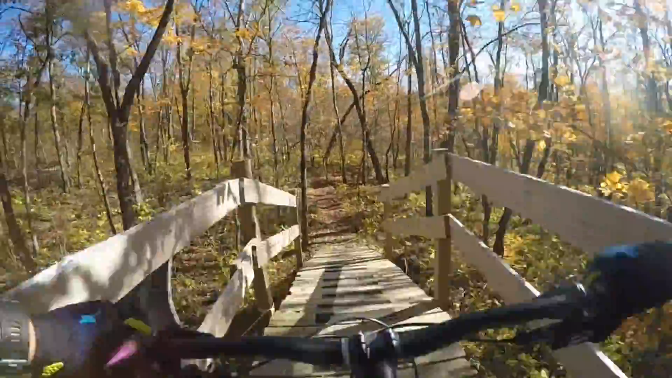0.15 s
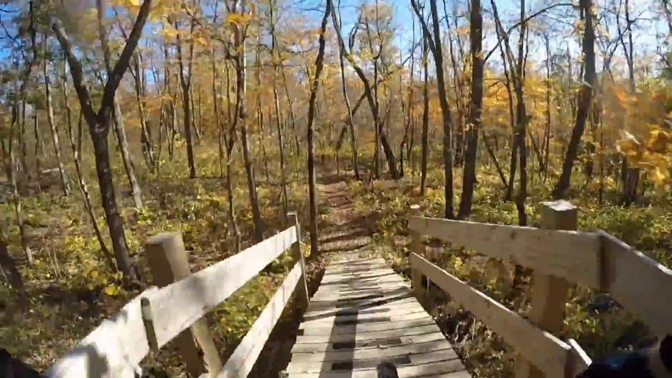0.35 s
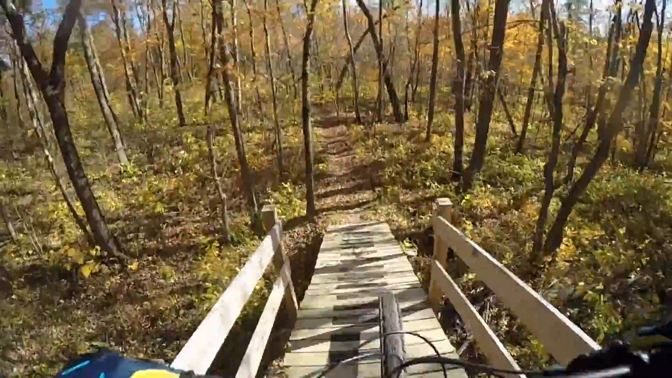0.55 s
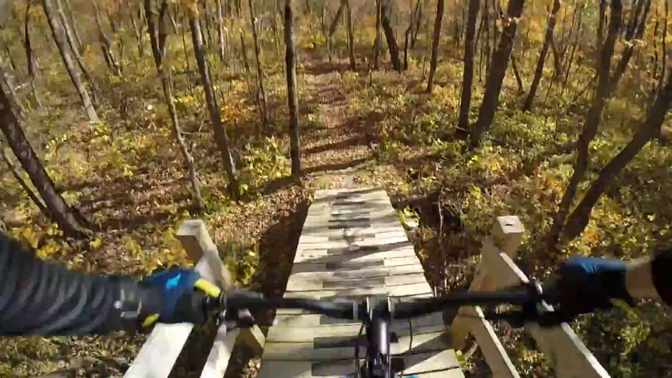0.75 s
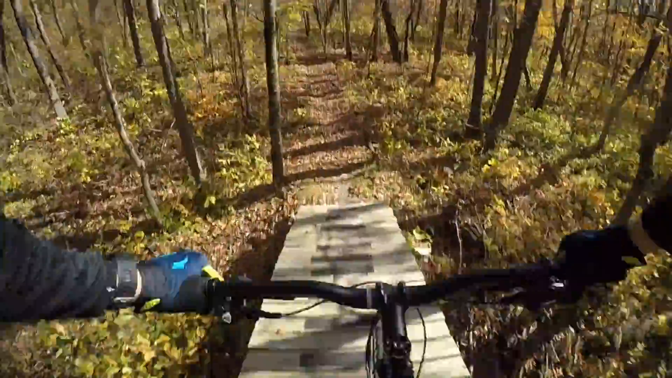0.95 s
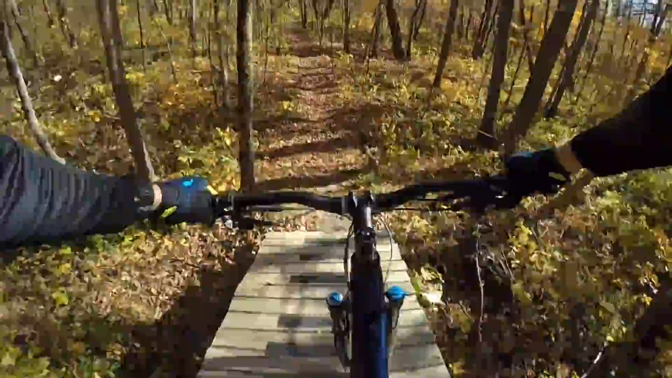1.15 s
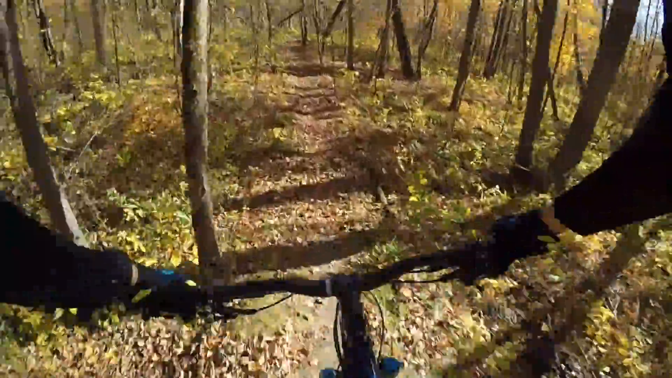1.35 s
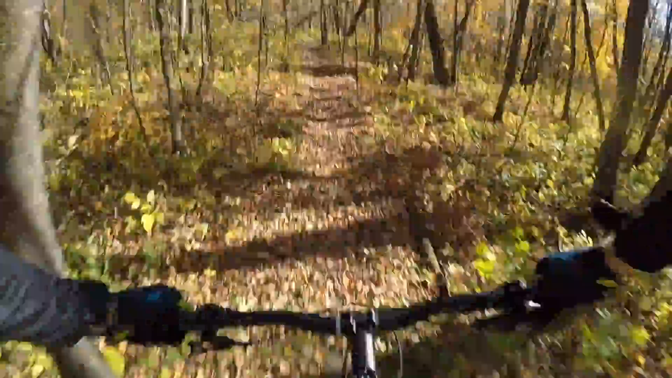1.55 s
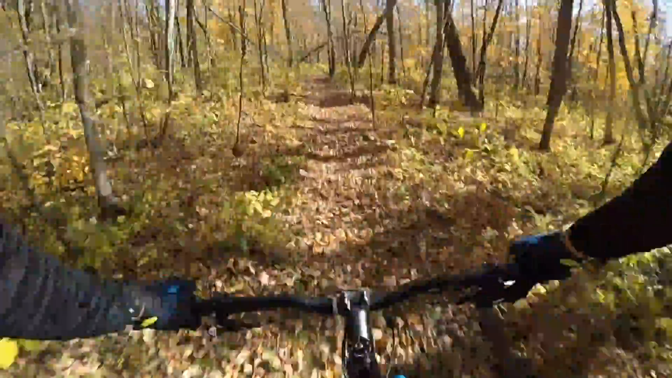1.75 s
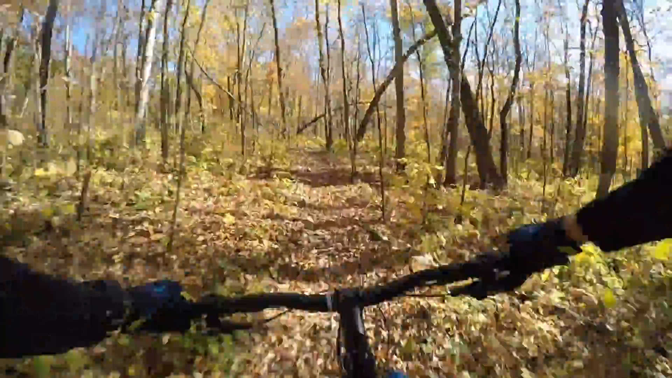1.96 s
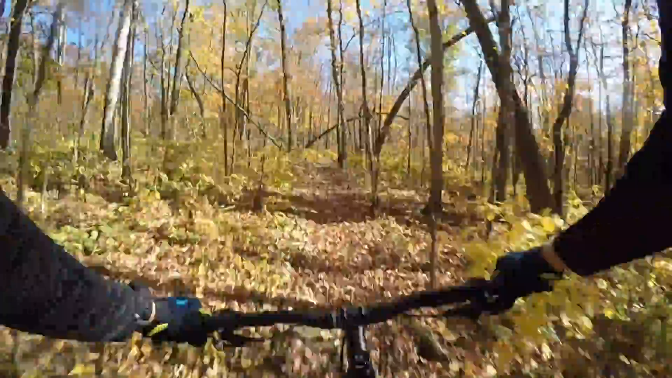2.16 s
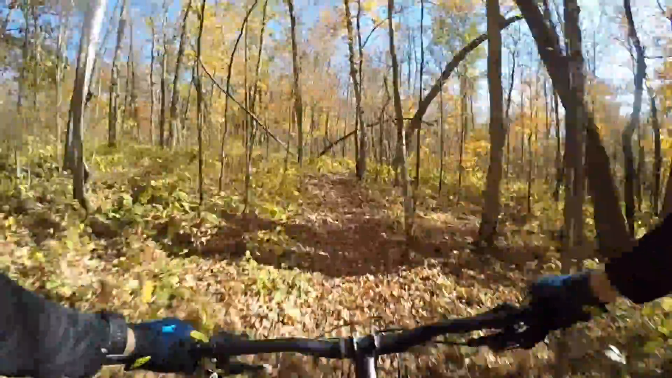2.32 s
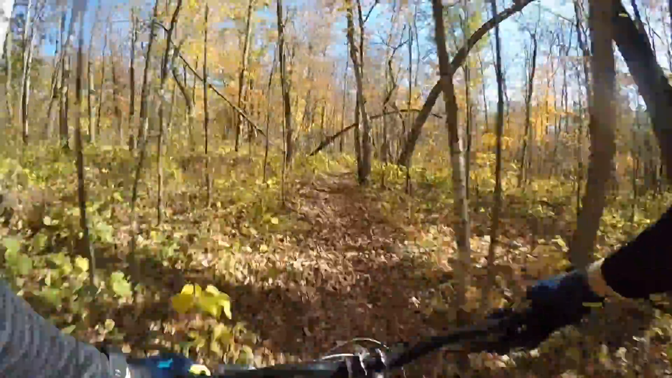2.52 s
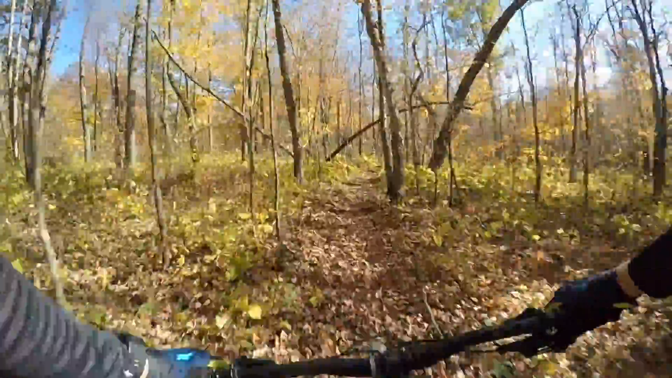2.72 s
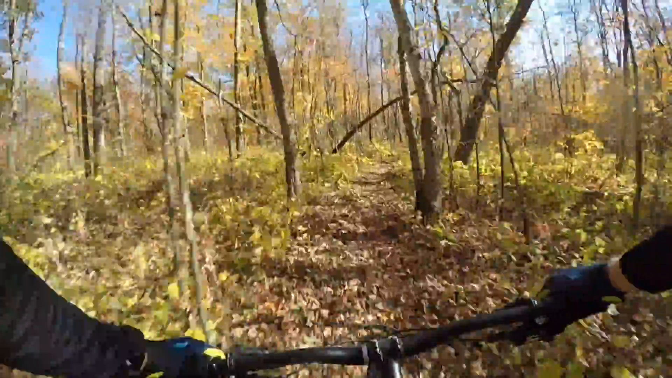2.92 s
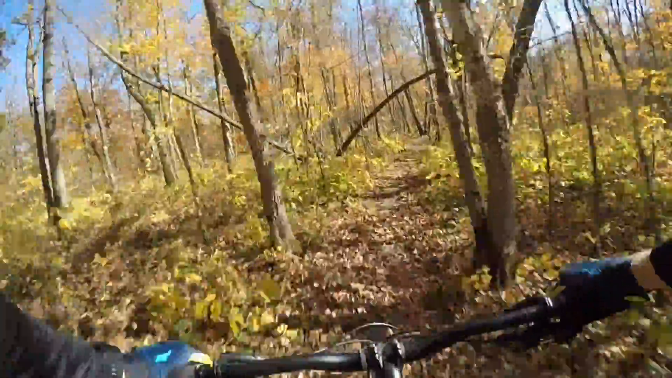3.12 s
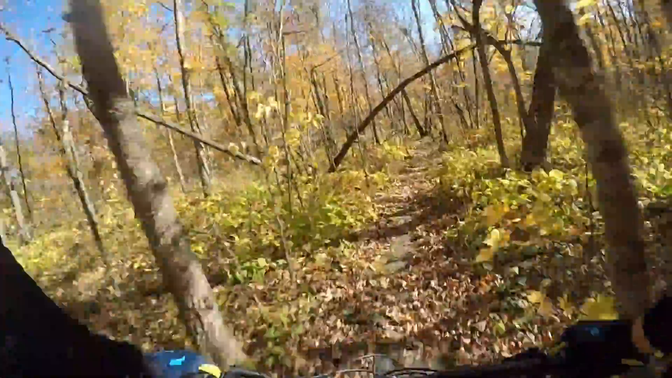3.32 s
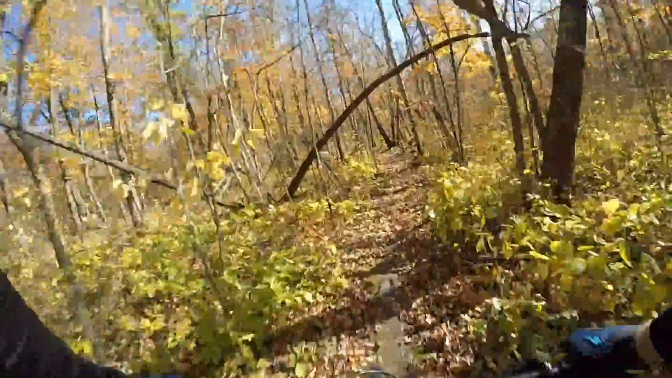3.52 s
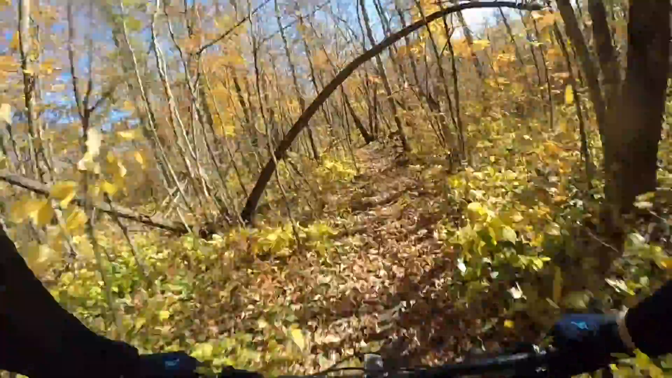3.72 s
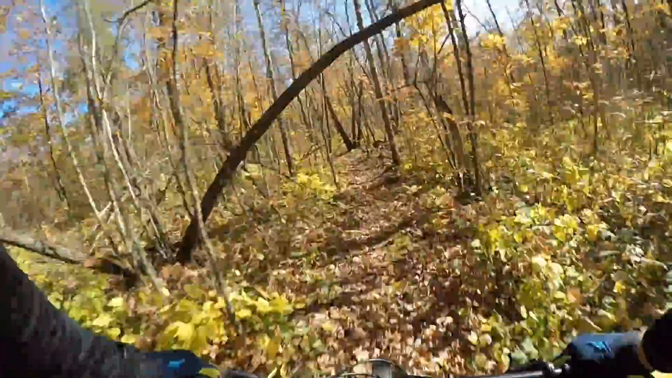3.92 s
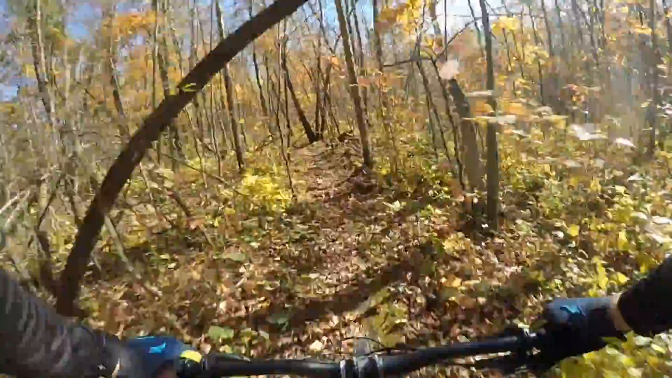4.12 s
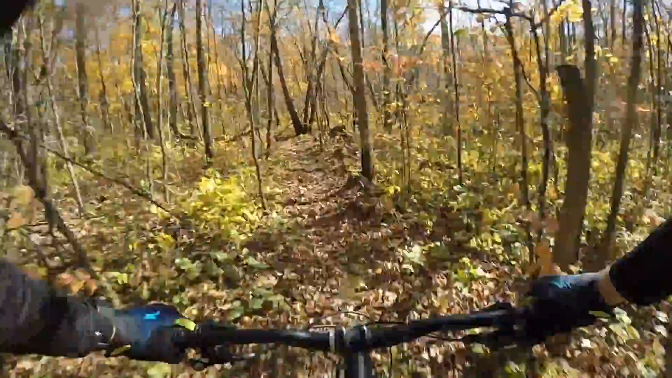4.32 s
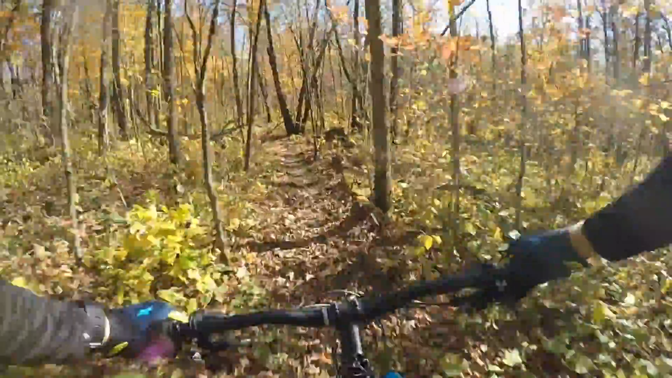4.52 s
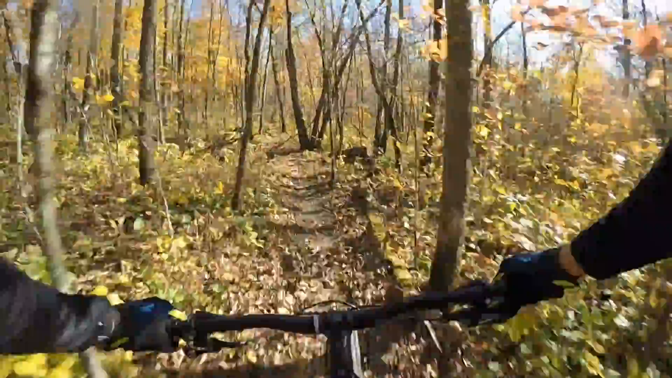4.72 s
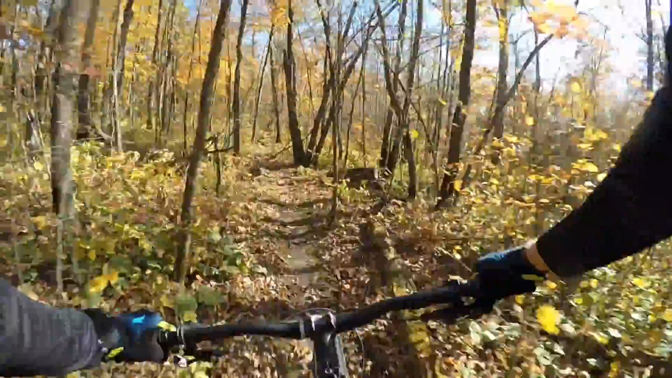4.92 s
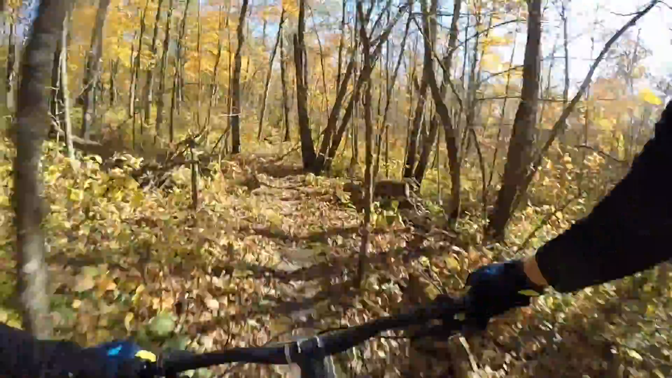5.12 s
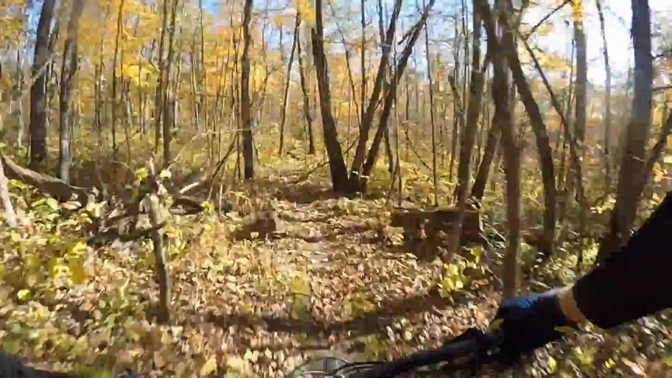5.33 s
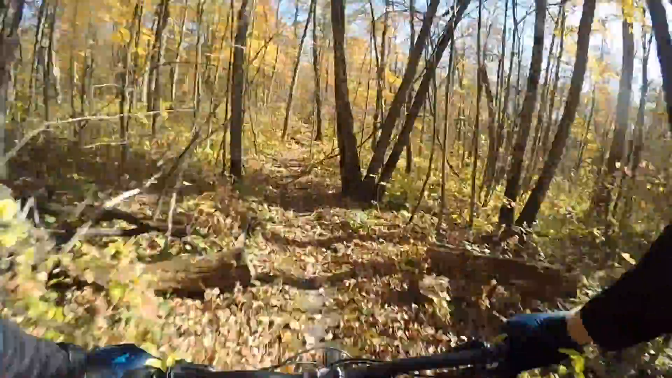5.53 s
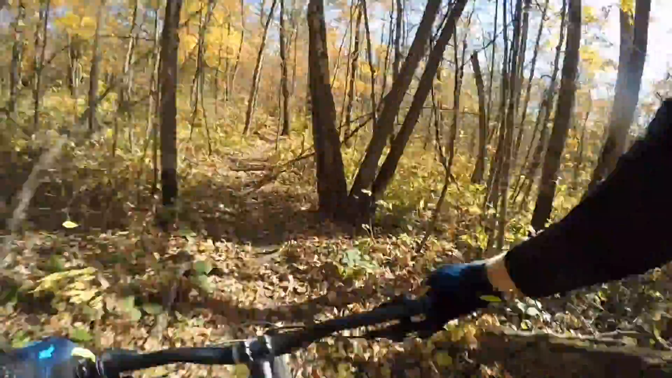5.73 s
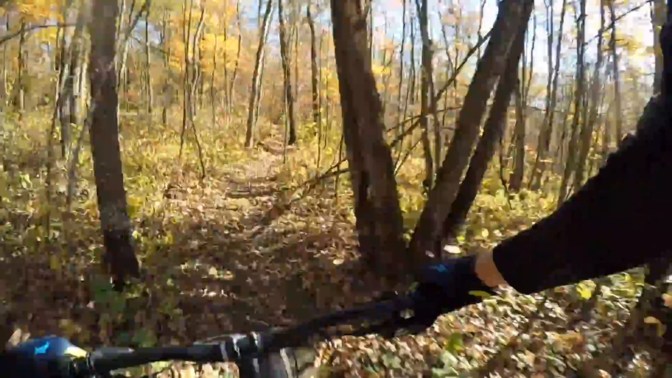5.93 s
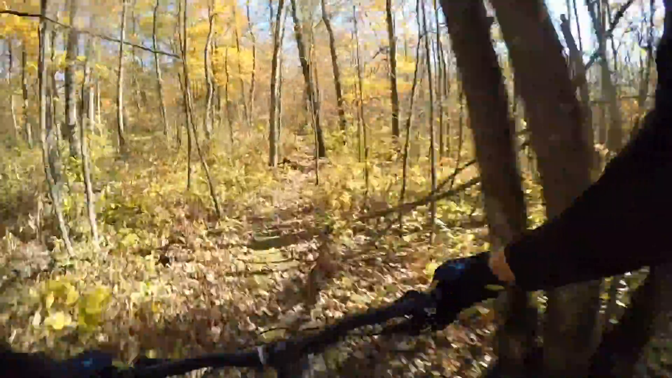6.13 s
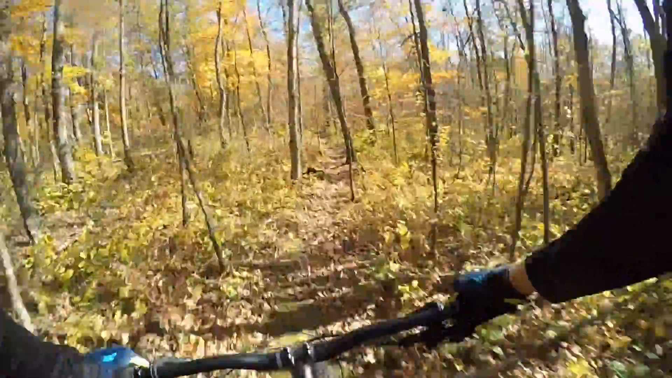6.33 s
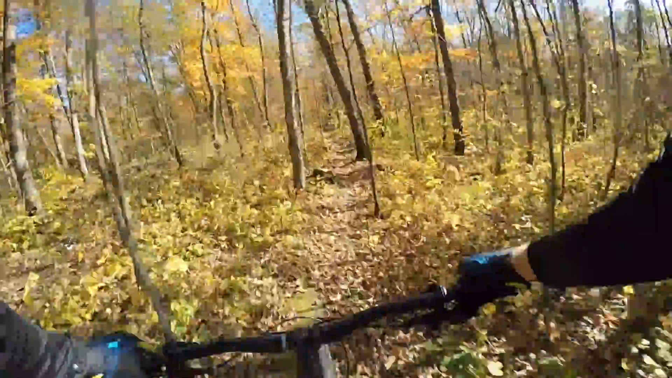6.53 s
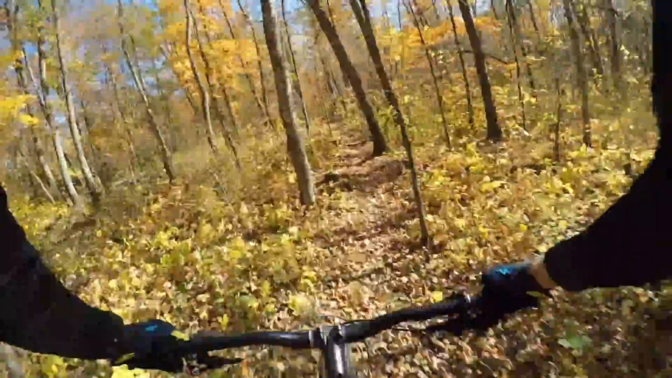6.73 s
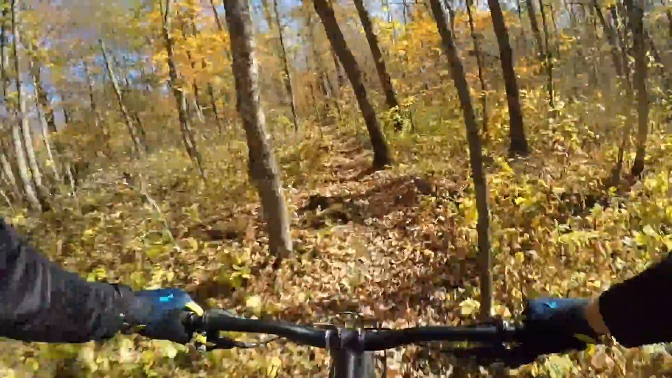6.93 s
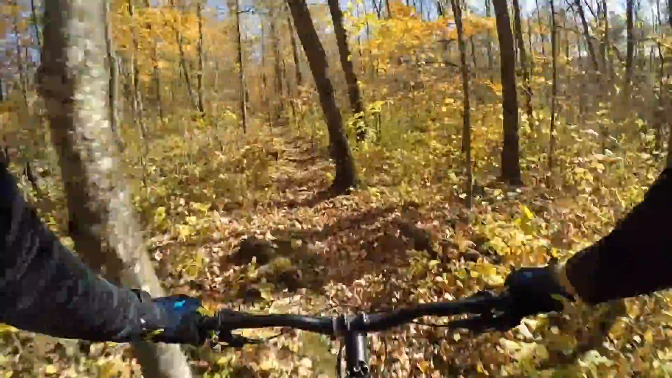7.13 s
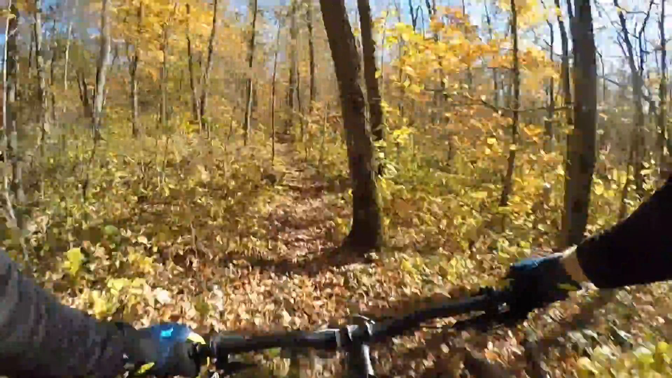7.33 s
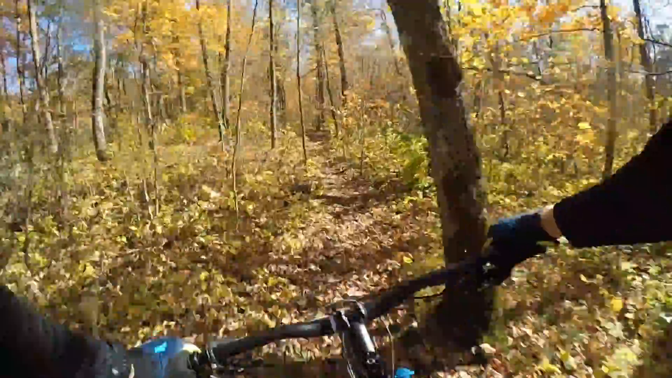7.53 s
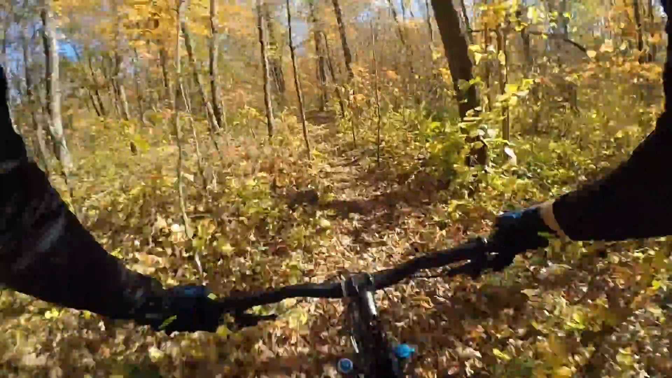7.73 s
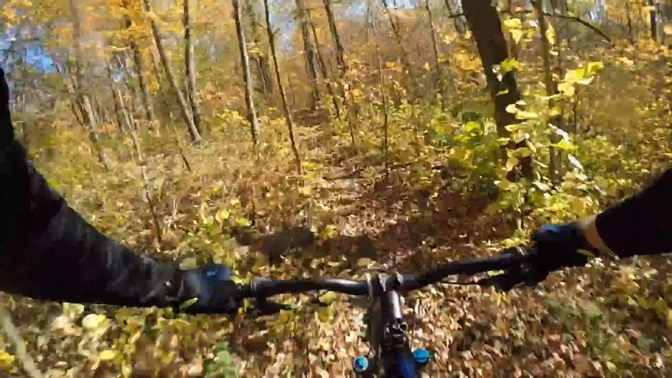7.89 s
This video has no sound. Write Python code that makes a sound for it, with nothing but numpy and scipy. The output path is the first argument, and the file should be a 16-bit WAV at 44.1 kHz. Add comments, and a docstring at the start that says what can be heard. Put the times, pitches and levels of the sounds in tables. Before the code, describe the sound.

A mountain bike clatters over wooden planks, lands with a thud and crunches on through dry leaves and snapping twigs.

```python
"""On a woodland trail, a mountain bike clatters over a plank bridge, drops off its end and rolls on
through dry fallen leaves. The tyres hiss on wood and hum on dirt, the coasting hub ticks, bumps knock
the frame, twigs snap and leaves crunch. We listen from a camera on the rider's chest: its plastic case
colours the crunch and clacks at the bumps, and its harness passes on deep jolts and a steady thump,
most likely the rider's fast heartbeat."""
import sys
import numpy as np
from scipy import signal
from scipy.fft import rfft, irfft
from scipy.io import wavfile
from scipy.ndimage import uniform_filter1d

SR = 44100
rng = np.random.default_rng(int(sys.argv[2]) if len(sys.argv) > 2 else 0)


def wav_record(signal):
    """Record a signal, one row per channel, as 16-bit PCM in the file named by sys.argv[1]."""
    frames = np.transpose(np.atleast_2d(signal))
    bounded = np.clip(frames, -1, 1)
    # unit amplitude maps onto the largest positive 16-bit level
    quanta = np.round(bounded * 32767).astype(np.int16)
    wavfile.write(sys.argv[1], SR, quanta)


N = 355446
T = np.arange(N) / SR
TAPS = 2048  # samples in one short ring or rattle

# bumps that hit the bike: time_s, knock_db, knock_pitch_hz, clack_db, thud_db
BUMPS = [(0.013, -20, 560, -22, -5), (0.286, -10, 553, 3, 4.5), (0.757, -11.5, 1660, -15, -22),
         (0.806, -9.5, 2680, -25, -38), (0.821, -13, 1260, -37, -18), (0.911, -10, 1330, -4, -7),
         (0.925, -13, 1000, -14, -9), (0.957, -12, 1390, -1.5, -12), (1.052, -20, 2880, -24, -25),
         (1.074, -5.5, 3040, -7.5, 2.5), (1.203, -18, 1140, -26, -21), (1.598, -21, 1500, -7, -6.5),
         (1.699, -4.5, 1130, -21, -5), (2.019, -16, 1370, -9.5, -32), (2.154, -17.5, 1270, -26, -19),
         (3.012, -15, 1250, -4, -26), (4.494, -24, 1200, -37, -20), (4.626, -13.5, 1250, -22, -21),
         (5.253, -22.5, 1475, -28, -30), (6.848, -28, 1550, -11, -15), (7.262, -19, 1200, -27, -31)]
# pitches at which the camera case rings: pitch_hz, width_hz, boost_db
CASE_RINGS = [(1728, 266, 7), (2357, 620, 13.5), (3392, 457, 10.5), (3978, 603, 11), (4444, 195, 10),
              (5250, 210, 7), (5662, 240, 9), (6370, 230, 3), (6820, 104, 5), (7430, 780, 2),
              (9380, 730, 1.5), (10900, 560, 4.5), (13160, 760, 5.5)]
# tone of a breaking twig, also used for grit and a tyre scuff: pitch_hz, level_db
TWIG_TONE = [(300, -20), (1200, 2), (2300, 7.5), (4500, 4), (7000, 3), (10000, -7), (15500, -14)]
# how rough the ground is: time_s, tyre_rumble_db, harness_sway_db
GROUND = [(0, -38.5, -28), (.15, -56, -21), (.8, -51, -22), (1.15, -51, -21.5), (1.4, -47.5, -26),
          (1.7, -45.5, -18.5), (2.6, -54, -27), (5.3, -55, -26), (6.1, -53, -25.5), (8.06, -64, -29.5)]


def undb(db):
    """Turn decibels into a number to multiply by."""
    return 10 ** (np.asarray(db) / 20)


def unit(x):
    """Scale a sound to an average power of 1."""
    return x / np.sqrt(np.mean(x ** 2))


def unit_energy(x):
    """Scale a short sound to a total energy of 1."""
    return x / np.sqrt(np.sum(x ** 2))


def curves(table):
    """Join the values in each column of a table with straight lines over time."""
    times_s, *columns = np.transpose(table)
    return [np.interp(T, times_s, column) for column in columns]


def add(track, start_s, sound):
    """Mix a sound into a track at a given time."""
    i = int(np.clip(start_s * SR, 0, N - 1))
    track[i:i + len(sound)] += sound[:N - i]


def wobble(per_s):
    """A smooth random wobble, about 1 in size, with per_s new values each second."""
    hold = max(int(SR / per_s), 1)
    steps = rng.standard_normal(N)[np.arange(N) // hold]
    return unit(uniform_filter1d(uniform_filter1d(steps, hold), hold))


def response(tone, rings=(), size=TAPS):
    """How a thing with this tone and these ringing pitches answers one click; energy 1."""
    hz = np.maximum(np.arange(size // 2 + 1) * SR / size, 1)
    tone_hz, tone_db = np.transpose(tone)
    db = np.interp(np.log(hz), np.log(tone_hz), tone_db)
    db += sum(boost * .5 ** ((2 * (hz - pitch) / width) ** 2) for pitch, width, boost in rings)
    # keep the tone, but make all the ringing come after the click
    cepstrum = irfft(np.log(undb(db)))
    cepstrum[1:size // 2] *= 2
    cepstrum[size // 2 + 1:] = 0
    return unit_energy(irfft(np.exp(rfft(cepstrum))))


def ring(x, answer):
    """Pass a sound through a thing, given its answer to one click."""
    return signal.fftconvolve(x, answer)[:len(x)]


def band(x, low_hz, high_hz):
    """Gently turn down everything outside a range of pitches."""
    return signal.sosfilt(signal.butter(2, [low_hz, high_hz], "band", fs=SR, output="sos"), x)


def cracks(per_s, spread_db):
    """Random clicks, many small and a few large."""
    size = undb(spread_db * np.minimum(rng.exponential(size=N), 5))
    return unit((rng.random(N) < per_s / SR) * size * rng.choice([-1, 1], N))


def strike(fade_s, rattle):
    """A sharp hit and the dying chatter after it."""
    push = rattle * unit_energy(rng.standard_normal(TAPS) * np.exp(-T[:TAPS] / fade_s))
    push[0] += 1
    return push / np.sqrt(1 + rattle ** 2)


def swings(pushes, rise_cycles, fall_cycles):
    """Each push swings the camera to and fro."""
    out = np.zeros(N)
    t = np.arange(-SR // 5, SR // 5) / SR
    width = np.where(t < 0, rise_cycles, fall_cycles)
    for peak_s, db, hz in pushes:
        cycles = hz * t
        swing = -np.cos(2 * np.pi * cycles) * np.exp(-(cycles / width) ** 2)
        add(out, peak_s + t[0], undb(db) * swing[t >= -peak_s])
    return out


def tyre_tread():
    """Rubber knobs hiss and crush grit on the planks, then hum unevenly on the dirt."""
    # hiss on the planks: time_s, level_db
    plank_hiss = [(0, -44.5), (.1, -48), (.18, -53.5), (.32, -43.5), (.46, -46), (.58, -53), (.85, -49),
                  (1.11, -43.5), (1.3, -50)]
    # tone of that hiss: pitch_hz, level_db
    hiss_tone = [(400, 7.5), (1000, 3), (1500, 5), (2400, -1.5), (3000, 4), (4000, -6), (4800, -4.5),
                 (7000, -8), (9000, -12.5), (15500, -18)]
    # rolling speed on dirt: time_s, knobs_per_s
    speed = [(1.7, 306), (2.8, 294), (3.2, 288), (3.7, 310), (5.6, 274), (6.1, 353), (6.9, 302),
             (8.06, 313)]
    leave_bridge_s, on_dirt_s, hum_fade_db_per_s = 1.7, 2.16, 0.8
    hiss_db, = curves(plank_hiss)
    knobs_per_s, = curves(speed)
    patter = rng.standard_normal(N) * undb(1.3 * wobble(120))
    hiss = ring(patter, response(hiss_tone, CASE_RINGS)) * undb(hiss_db)
    grit = undb(-60) * ring(cracks(per_s=1200, spread_db=2.5), response(TWIG_TONE, CASE_RINGS))
    knobs_passed = np.cumsum(knobs_per_s * (1 + .075 * wobble(70))) / SR
    hum_db = -60 - hum_fade_db_per_s * (T - on_dirt_s)
    hum = unit(np.sin(2 * np.pi * knobs_passed) * undb(3.6 * wobble(25))) * undb(hum_db)
    on_bridge = np.interp(T, [leave_bridge_s, on_dirt_s], [1, 0])
    return (hiss + grit) * on_bridge + hum * (1 - on_bridge)


def tyre_rumble():
    """The tyres rumble on any ground and shudder for a moment after each bump."""
    # tone of the rumble: pitch_hz, level_db
    rumble_tone = [(40, -14.5), (100, 7.5), (160, 2), (230, 0.5), (300, 1.5), (380, -1.5), (560, -6),
                   (740, -3), (950, -11.5), (1400, -9.5), (3000, -60.5)]
    fade_s = 0.16
    rumble_db, _ = curves(GROUND)
    shaking = rng.standard_normal(N) * undb(2.0 * wobble(35) + 0.43 * wobble(9))
    shudder = sum(undb(thud_db - 49) * (T > s) * np.exp(-abs(T - s) / fade_s) for s, *_, thud_db in BUMPS)
    return ring(shaking, response(rumble_tone)) * np.hypot(undb(rumble_db), shudder)


def harness():
    """The chest strap carries a deep sway, plus jolts and heartbeats that each bring a short flutter."""
    # tone of the sway: pitch_hz, level_db
    sway_tone = [(8, -15.5), (20, 3.5), (29, -8), (45, -12.5), (70, -19), (110, -27.5), (170, -37.5),
                 (300, -68), (800, -100)]
    # jolts that rock the camera: time_s, peak_db, bounce_hz
    jolts = [(0.2, -14.5, 42), (0.25, -9, 16.3), (0.437, -7.5, 27.5), (0.458, -4, 31), (0.528, -8.5, 26.6),
             (0.628, -13.5, 42), (0.678, -9, 21.4), (0.738, -3.5, 27), (0.91, -10, 37), (0.968, -2, 29),
             (1.105, -14.5, 23), (1.237, -14, 25), (1.396, -14, 34), (1.581, -3, 26.8), (1.636, -4.5, 24.7),
             (1.738, -9.5, 14.3), (1.826, -11, 32), (1.968, -15.5, 20), (4.507, -17.5, 28),
             (6.968, -16.5, 20), (7.92, -16.5, 20)]
    _, sway_db = curves(GROUND)
    beats = heartbeats()
    sway = ring(rng.standard_normal(N), response(sway_tone, size=16384))
    sway *= undb(sway_db + 0.92 * wobble(6.6))
    near_beat = sum(undb(db - 14) * np.exp(-((T - s - .015) / 0.032) ** 2) for s, db, _ in beats)
    near_jolt = sum(undb(db - 22) * np.exp(-((T - s) / 0.015) ** 2) for s, db, _ in jolts)
    flutter = unit(band(band(rng.standard_normal(N), 38.6, 80.4), 34, 123)) * (near_beat + near_jolt)
    rocking = swings(jolts, rise_cycles=0.61, fall_cycles=0.7)
    thumps = swings(beats, rise_cycles=0.47, fall_cycles=1.0)
    return sway + flutter + rocking + thumps


def freewheel():
    """Small catches drop over teeth in the coasting hub: faint, bright ticks that swell and fade."""
    # tone of a tick: pitch_hz, level_db
    tick_tone = [(2000, -26), (5000, -8), (7500, -5), (11000, 5), (14000, 0), (15500, -3)]
    ticks_per_s, tick_fade_s = 54, 0.0033
    loudest_s, swell_s, level_db = 0.65, .8, -66.5
    teeth_passed = np.floor(np.cumsum(ticks_per_s * (1 + .07 * wobble(30))) / SR)
    drops = np.diff(teeth_passed, prepend=0) * undb(3.5 * wobble(60))
    chatter = ring(drops, np.exp(-T[:TAPS] / tick_fade_s)) * rng.standard_normal(N)
    ticks = unit(ring(chatter, response(tick_tone)))
    return ticks * undb(level_db) * np.exp(-((T - loudest_s) / swell_s) ** 2)


def bumps():
    """Each bump knocks the frame, clacks the case in its mount and thuds through the harness."""
    # tone of the clack: pitch_hz, level_db
    clack_tone = [(500, -50), (1400, -18), (1950, -11), (2180, 4), (2750, -1), (3050, -27), (3400, -25),
                  (3900, -11.5), (5000, -22), (7000, -19), (12000, -60)]
    # tone of the thud: pitch_hz, level_db
    thud_tone = [(30, -22), (120, -7), (250, -3.5), (350, -1.5), (450, -1.5), (600, -4.5), (900, -14.5),
                 (2000, -17.5), (6000, -57)]
    # hard landings that also boom through the harness: time_s, peak_db
    landings = [(0.288, -15.5), (1.077, -11), (1.701, -5.5), (4.627, -31)]
    boom_hz = 120
    out = np.zeros(N)
    for time_s, knock_db, hz, clack_db, thud_db in BUMPS:
        hit = strike(fade_s=0.0066, rattle=0.78)
        knock = band(band(hit, hz - 450, hz + 450), hz - 450, hz + 450)
        add(out, time_s - .001, undb(knock_db) * unit_energy(knock))
        clack = ring(strike(fade_s=0.012, rattle=0.31), response(clack_tone))
        # plastic gives a little, which rounds the start of the clack
        add(out, time_s, undb(clack_db) * band(clack, 850, 4800))
        thud = ring(strike(fade_s=0.011, rattle=0.44), response(thud_tone))
        add(out, time_s + 0.00125, -undb(thud_db) * thud)
    return out + swings([(s, db, boom_hz) for s, db in landings], rise_cycles=0.19, fall_cycles=0.5)


def squeak():
    """The bike gives one brief, thin squeak whose pitch scratches up and down."""
    # the squeak: time_s, swell_s, pitch_hz, peak_db
    squeak_note = (0.452, .014, 6350, -43)
    time_s, swell_s, pitch_hz, peak_db = squeak_note
    cycles = np.cumsum(pitch_hz + 300 * wobble(1400)) / SR
    return undb(peak_db) * np.exp(-((T - time_s) / swell_s) ** 2 / 2) * np.sin(2 * np.pi * cycles)


def snaps_and_scuff():
    """A splintering twig or scuffing tyre makes a burst that builds and dies; brittle means brighter."""
    # twigs and stiff leaves that snap, and a short tyre scuff on the planks after a hard bump (1.08 s):
    # time_s, level_db, length_s, brittleness (0 to 1)
    bursts = [(0.626, -34, 0.0022, 1), (0.689, -14.5, 0.012, 0), (0.804, -24, 0.0023, 1),
              (0.929, -11.5, 0.022, .04), (1.08, -7, 0.014, 0), (1.133, -12, 0.0035, 0.1),
              (1.546, -13, .0055, 1), (1.683, -8.5, .006, 0.2), (3.013, -2, 0.00043, 0.4),
              (3.092, -7, 0.0074, 0), (3.309, -7.5, 0.0038, 0), (3.948, -17, 0.0037, 0),
              (3.985, -14, .005, 0.2), (4.359, -7.5, .0035, 0), (5.255, -9.5, 0.0074, 0.56),
              (5.363, -16.5, 0.0043, 0.3), (5.552, -13, .004, 0.3), (5.73, -12, .0035, 0),
              (6.277, -10, 0.0049, 0.2), (6.777, -12, 0.0057, 0.4), (6.830, -12, 0.0051, 0),
              (7.445, -7, 0.0058, 0)]
    out = np.zeros(N)
    for time_s, level_db, length_s, brittleness in bursts:
        age = T[:TAPS] / length_s
        burst = unit_energy(rng.standard_normal(TAPS) * age ** 0.64 * np.exp(-1.4 * age))
        bright_edge = 2 * brittleness * np.diff(burst, prepend=0)
        add(out, time_s - .001, undb(level_db) * (burst + bright_edge))
    return ring(out, response(TWIG_TONE, CASE_RINGS))


def leaf_strength():
    """How strong the crunch and its treble are: a carpet of leaves with thin patches and heaps."""
    # depth of the leaf carpet: time_s, crunch_db
    leaf_carpet = [(1.7, -39.5), (1.9, -35.5), (3.1, -35.5), (4.2, -37), (4.55, -40.5), (5.0, -41.5),
                   (5.3, -44.5), (5.62, -38), (6.0, -41), (6.25, -37), (6.45, -41.5), (7.0, -38),
                   (7.6, -34.5), (8.06, -38.5)]
    # thin patches where the crunch dies away: start_s, end_s, drop_db
    thin_patches = [(3.2, 3.318, 4.5), (3.618, 3.981, 10.5), (4.54, 4.69, 4.5), (5.363, 5.544, 6.5),
                    (6.47, 6.667, 9), (6.733, 6.837, 8)]
    # heaps crushed at once: time_s, peak_db, swell_s, extra_treble_db
    heaps = [(1.576, -38, 0.015, -2), (1.63, -47, 0.045, -3), (1.697, -31.5, 0.011, -0.5),
             (1.817, -30, 0.025, 0.5), (2.39, -39, 0.027, 7), (3.37, -39, 0.048, 0),
             (3.442, -33, 0.019, -3), (3.609, -30.5, 0.028, 0.5), (3.747, -40, 0.017, 4),
             (3.807, -38.5, 0.02, 0.5), (4.156, -39, 0.023, -3), (4.698, -35.5, 0.021, 1),
             (4.906, -40.5, 0.038, 3), (5.075, -33.5, 0.013, 1), (5.698, -34.5, 0.0087, -9),
             (5.872, -33.5, 0.017, -3), (6.178, -38, 0.0072, -2), (6.653, -35.5, 0.02, -1),
             (6.724, -32.5, 0.014, 2), (6.887, -34.5, 0.05, -2), (7.15, -33.5, 0.03, 2.5),
             (7.37, -33, 0.038, 1), (7.556, -33.5, .014, -8), (7.73, -38, 0.027, 4), (8.01, -36, 0.0089, 4)]
    landing_s, onset_s, thinning_s, crisp_db = 1.668, 0.018, 0.072, 1.7
    carpet_db, = curves(leaf_carpet)
    for start_s, end_s, drop_db in thin_patches:
        entering = np.clip((T - start_s) / thinning_s, 0, 1)
        leaving = np.clip((end_s - T) / onset_s + 1, 0, 1)
        carpet_db -= drop_db * entering * leaving
    carpet = undb(carpet_db) * np.clip((T - landing_s) / onset_s, 0, 1)
    body_power, treble_power = carpet ** 2, (carpet * undb(crisp_db)) ** 2
    for time_s, peak_db, swell_s, extra_treble_db in heaps:
        power = undb(peak_db) ** 2 * np.exp(-((T - time_s) / swell_s) ** 2)
        body_power += power
        treble_power += power * undb(extra_treble_db) ** 2
    return np.sqrt(body_power), np.sqrt(treble_power)


def leaves():
    """Leaves break in clumps, each a cloud of tiny cracks; every leaf size has its own pitch range."""
    # tone of the crunch: pitch_hz, level_db
    leaf_tone = [(200, -27.5), (600, -20), (1000, -17.5), (1400, -13), (2000, -11.5), (3000, -10),
                 (4000, -11), (4800, -9.5), (7000, -12), (8000, -15), (10000, -20), (12000, -22.5),
                 (15500, -28)]
    body, treble = leaf_strength()
    clumps = undb(1.2 * wobble(45) + 1.37 * wobble(220))
    shared_cracks = cracks(per_s=3500, spread_db=2.0)
    hz = np.maximum(np.arange(N // 2 + 1) * SR / N, 1)
    centres_hz = np.geomspace(1500, 13000, num=8)
    crunch = np.zeros(N)
    for centre_hz, this_range in zip(centres_hz, np.eye(len(centres_hz))):
        crackle = unit(shared_cracks + 1.44 * cracks(per_s=4000, spread_db=1.0))
        crackle *= unit(clumps * undb(1.12 * wobble(50) + 1.13 * wobble(250)))
        share = np.interp(np.log(hz), np.log(centres_hz), this_range) ** .75
        # crisp, dry leaves feed the highest ranges
        strength = body + (treble - body) * np.interp(centre_hz, [3500, 9000], [0, 1])
        crunch += irfft(rfft(crackle) * share, N) * strength
    return ring(crunch, response(leaf_tone, CASE_RINGS))


def heartbeats():
    """Evenly spaced beats, the stronger ones deeper, as rows of time_s, peak_db, pitch_hz."""
    # strength of the heartbeat: time_s, peak_db
    pulse = [(2.18, -14.5), (2.6, -12.5), (4.4, -9), (8.06, -11.5)]
    first_s, gap_s, average_hz, drop_hz_per_db = 2.186, .3912, 39, 1.5
    times_s = np.arange(first_s, T[-1], gap_s)
    db = np.interp(times_s, *np.transpose(pulse))
    return np.column_stack([times_s, db, average_hz - drop_hz_per_db * (db - db.mean())])


def scene():
    """All the sounds as they reach the rider's chest, in one channel."""
    ride = tyre_tread() + tyre_rumble() + harness() + freewheel() + bumps() + squeak()
    return (ride + snaps_and_scuff() + leaves())[None]


def record(dry):
    """The camera cuts off the very highest pitches."""
    top_hz = 15400
    return signal.sosfilt(signal.ellip(10, .2, 70, top_hz, fs=SR, output="sos"), dry)


dry = scene()
out = record(dry)
wav_record(out)
```